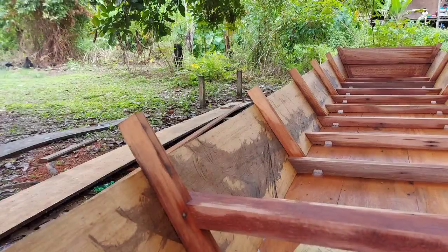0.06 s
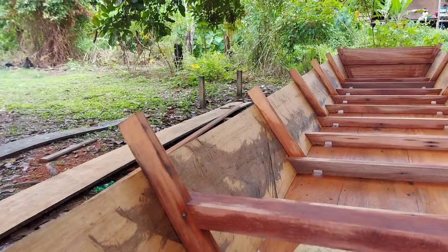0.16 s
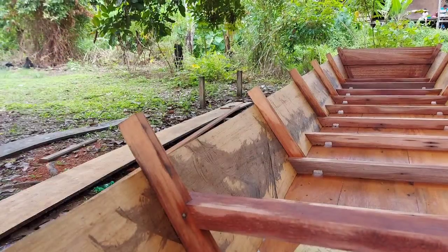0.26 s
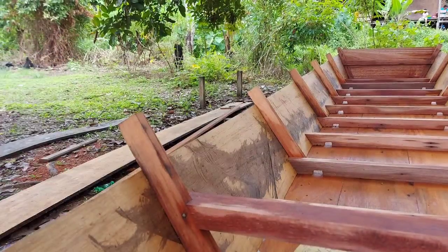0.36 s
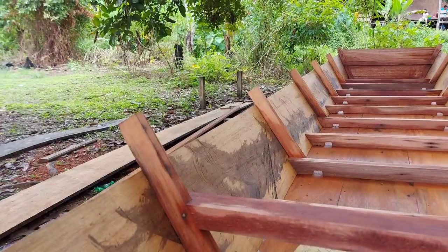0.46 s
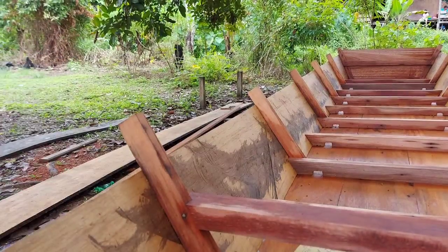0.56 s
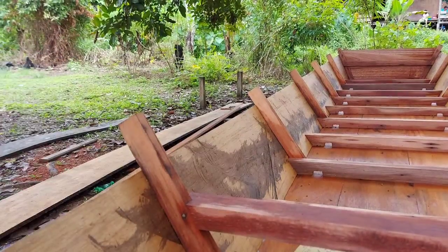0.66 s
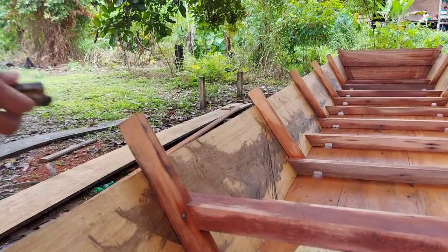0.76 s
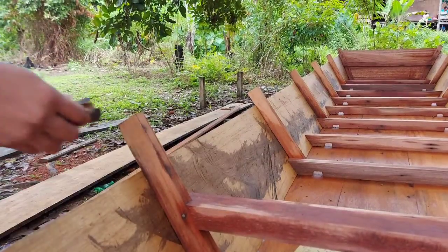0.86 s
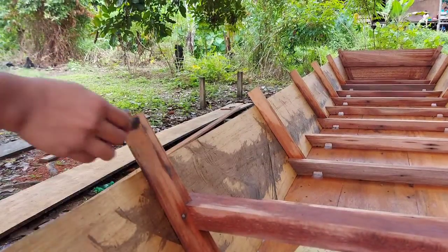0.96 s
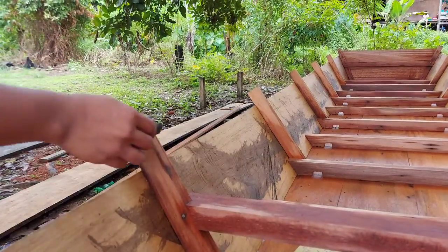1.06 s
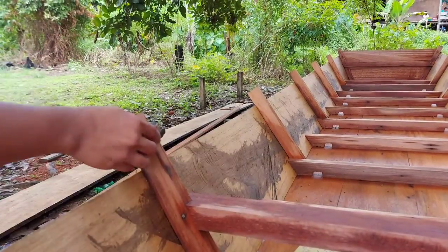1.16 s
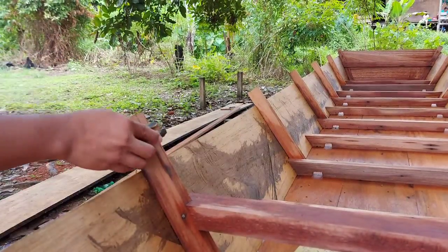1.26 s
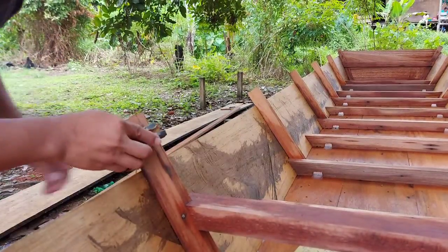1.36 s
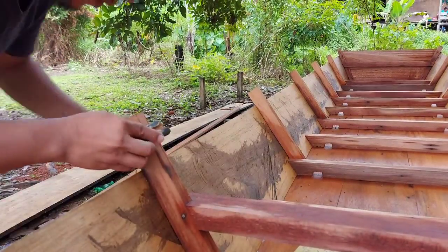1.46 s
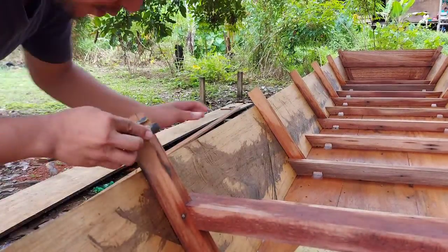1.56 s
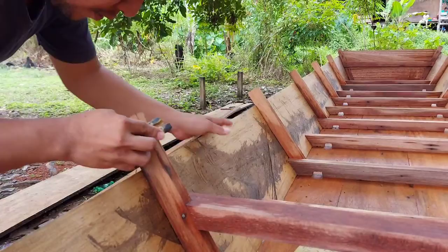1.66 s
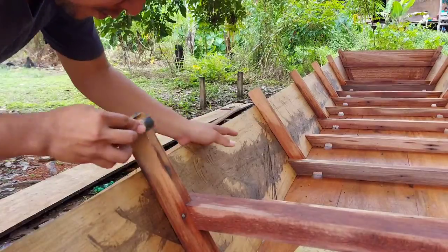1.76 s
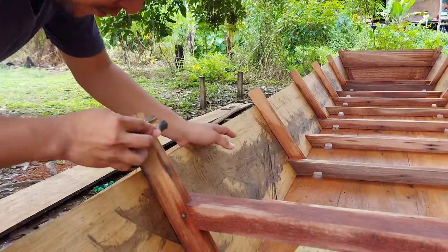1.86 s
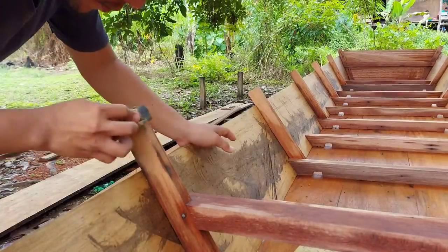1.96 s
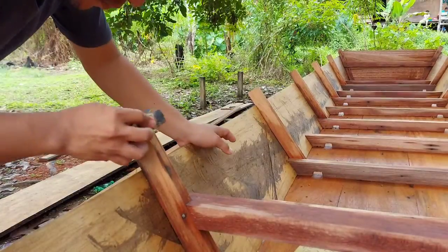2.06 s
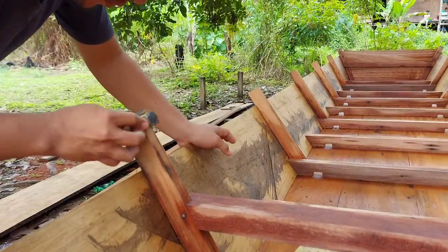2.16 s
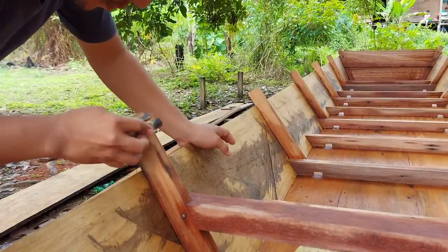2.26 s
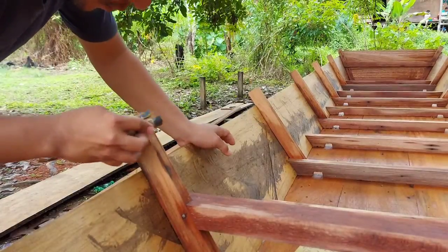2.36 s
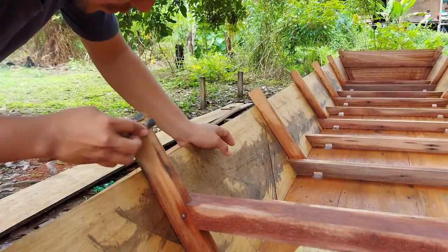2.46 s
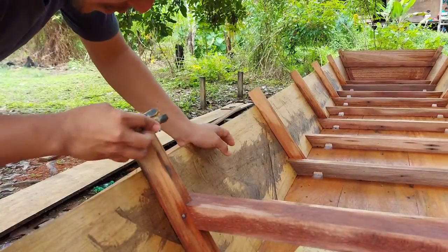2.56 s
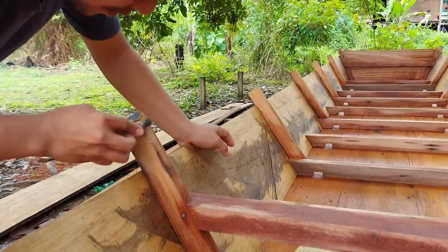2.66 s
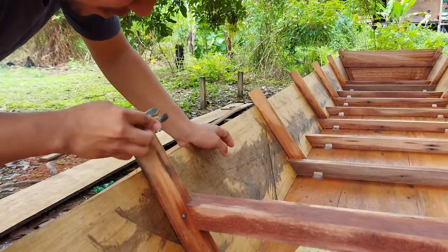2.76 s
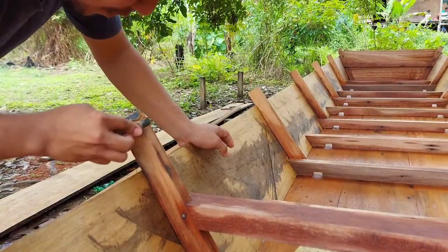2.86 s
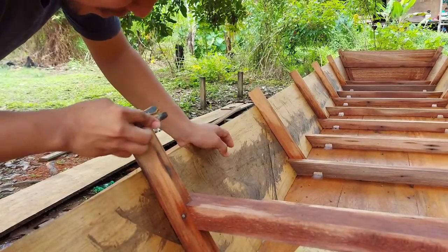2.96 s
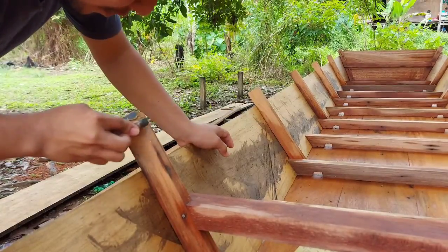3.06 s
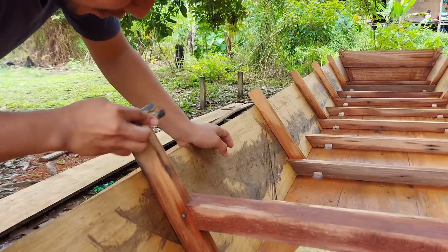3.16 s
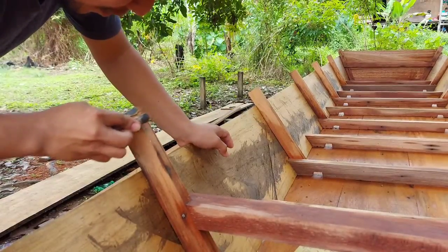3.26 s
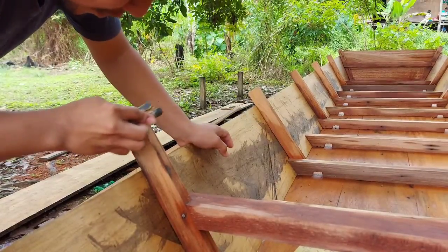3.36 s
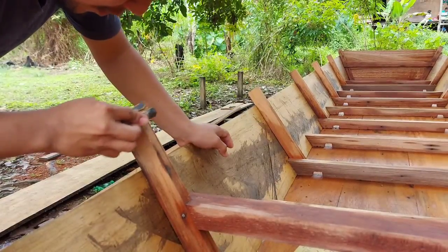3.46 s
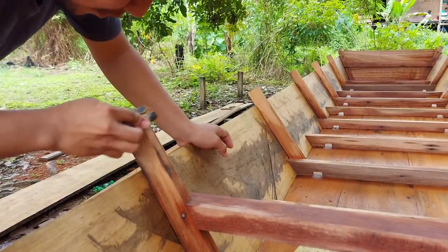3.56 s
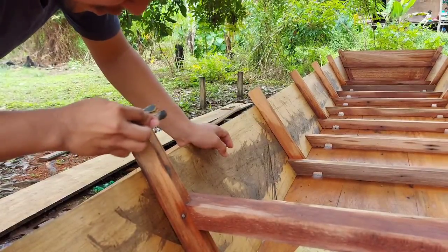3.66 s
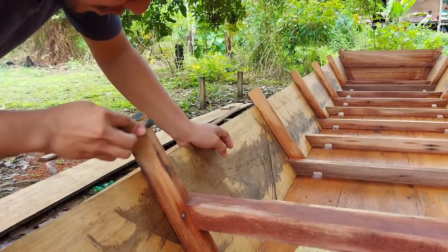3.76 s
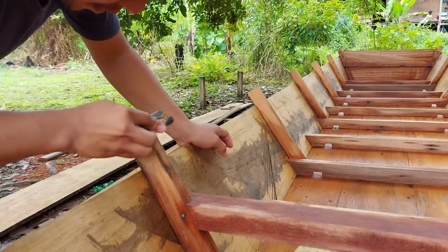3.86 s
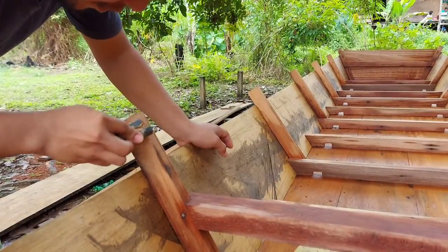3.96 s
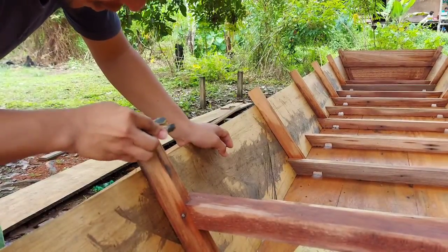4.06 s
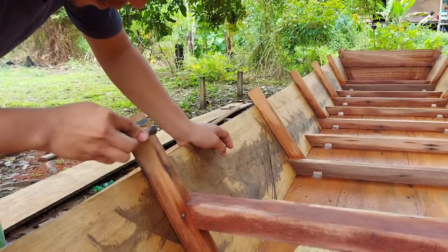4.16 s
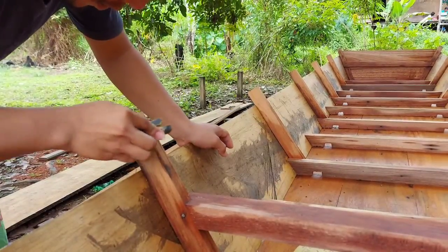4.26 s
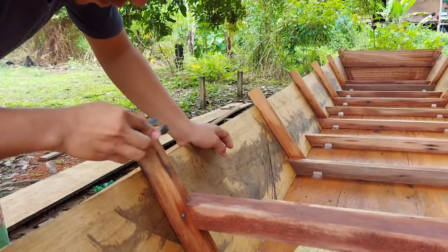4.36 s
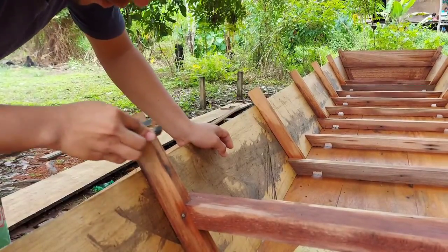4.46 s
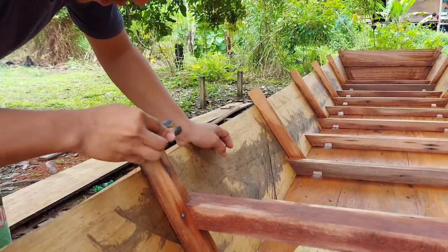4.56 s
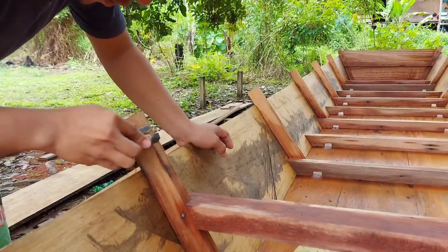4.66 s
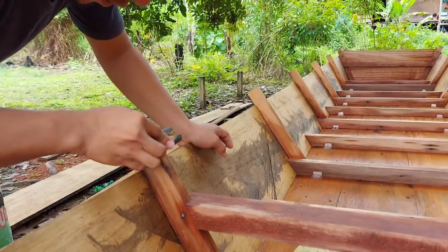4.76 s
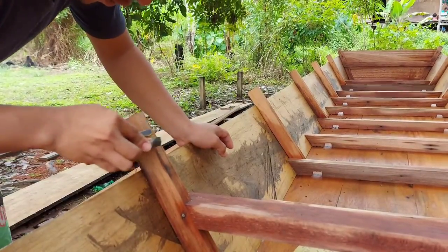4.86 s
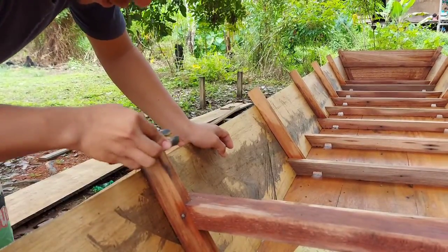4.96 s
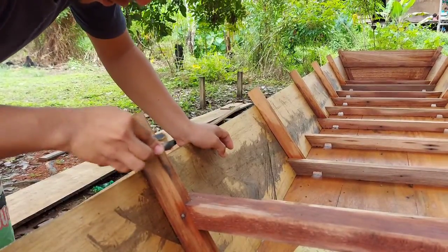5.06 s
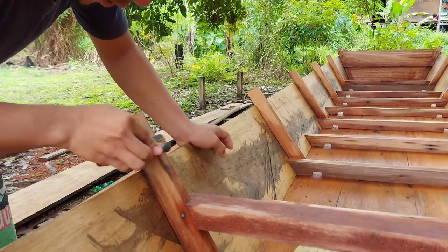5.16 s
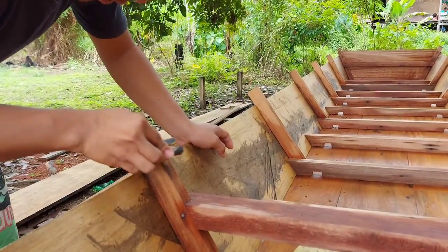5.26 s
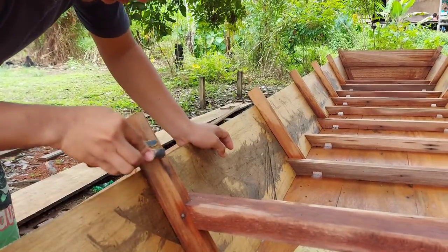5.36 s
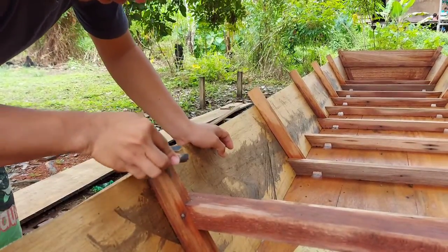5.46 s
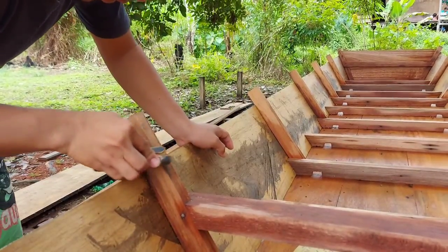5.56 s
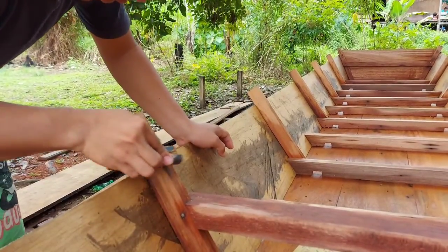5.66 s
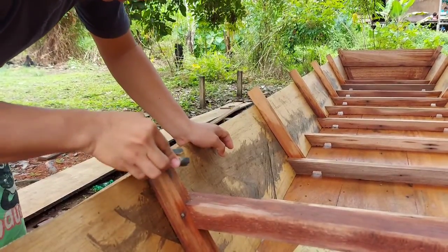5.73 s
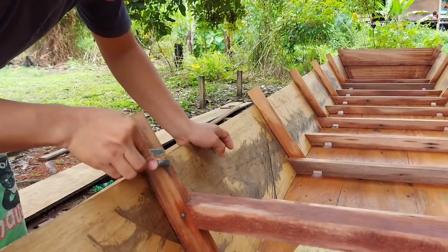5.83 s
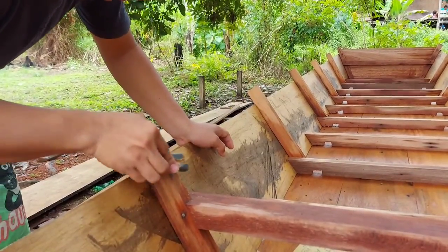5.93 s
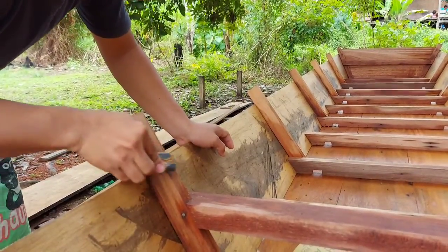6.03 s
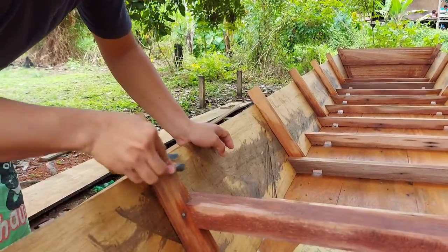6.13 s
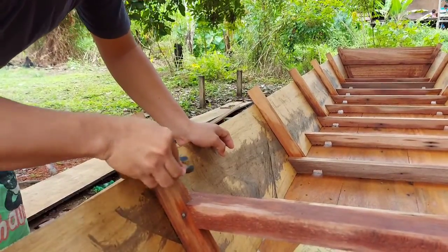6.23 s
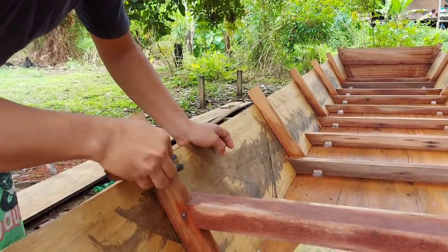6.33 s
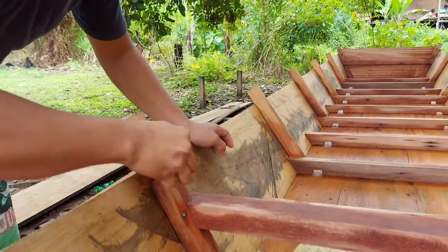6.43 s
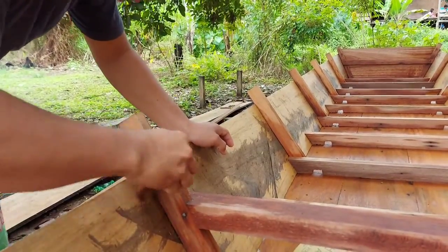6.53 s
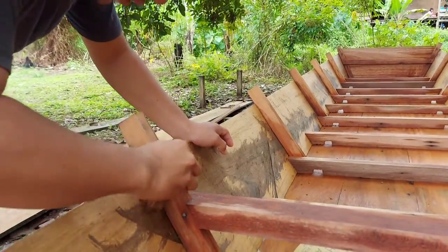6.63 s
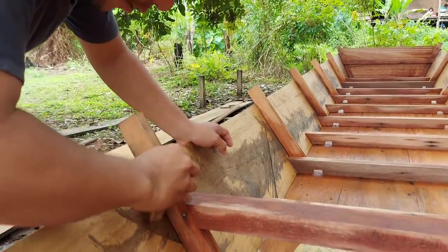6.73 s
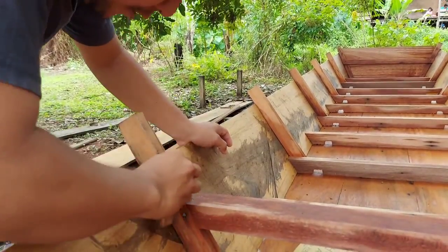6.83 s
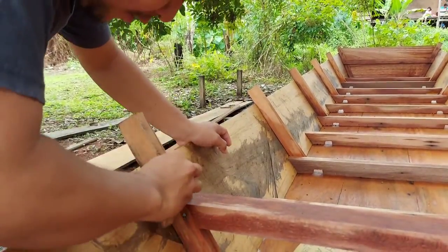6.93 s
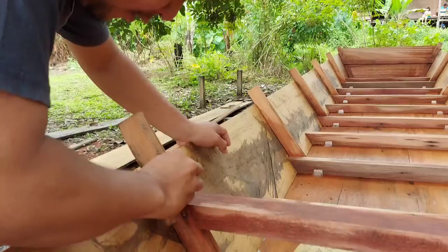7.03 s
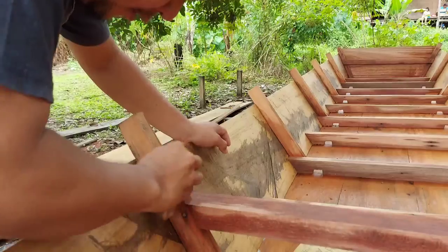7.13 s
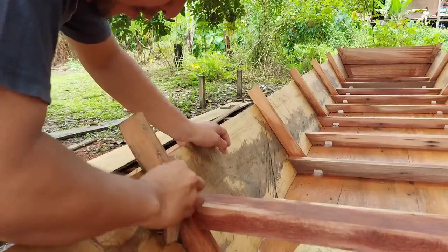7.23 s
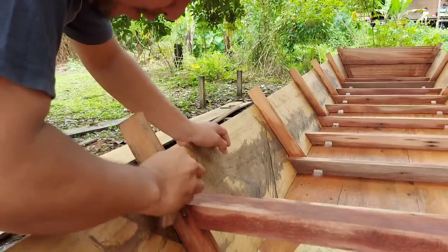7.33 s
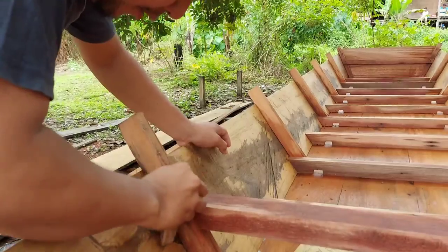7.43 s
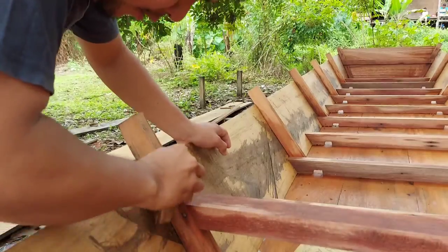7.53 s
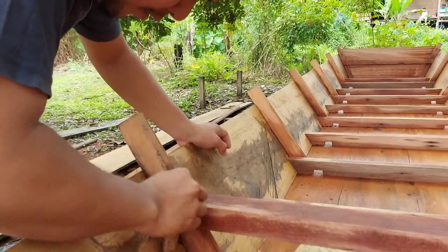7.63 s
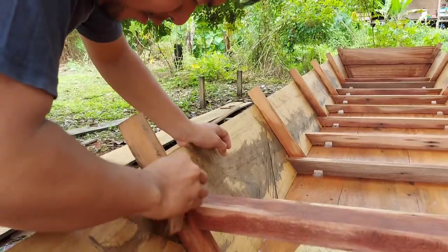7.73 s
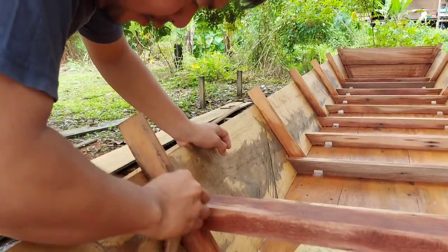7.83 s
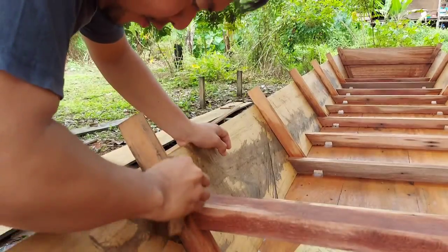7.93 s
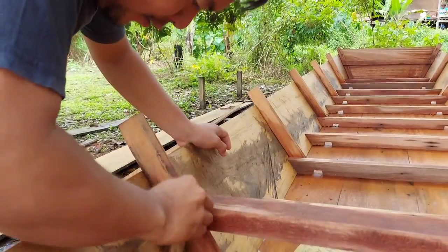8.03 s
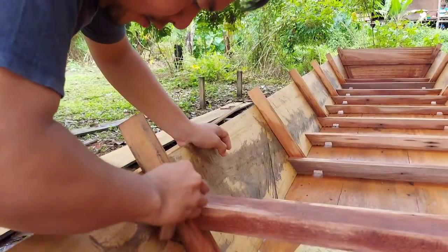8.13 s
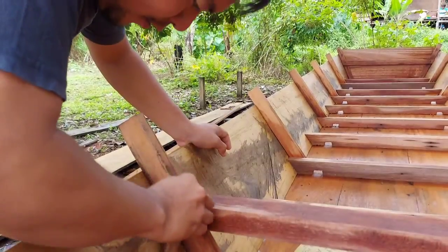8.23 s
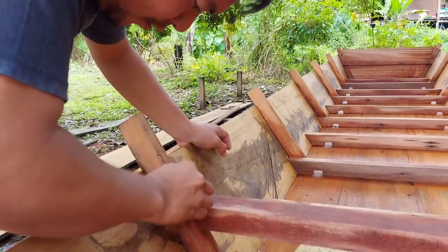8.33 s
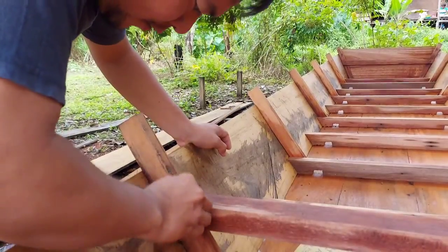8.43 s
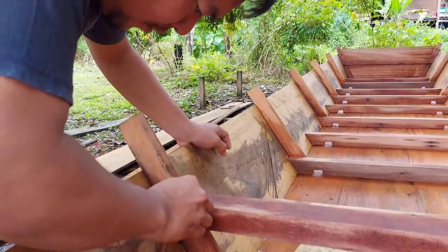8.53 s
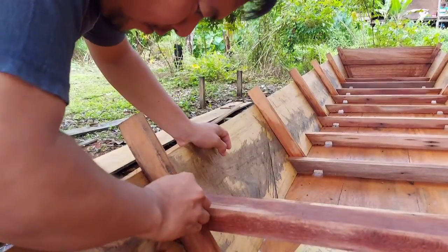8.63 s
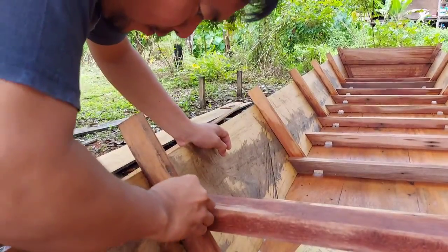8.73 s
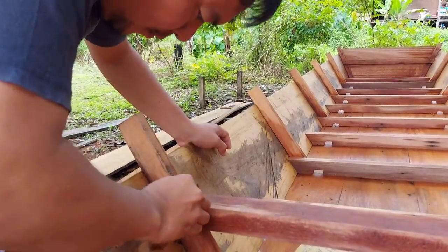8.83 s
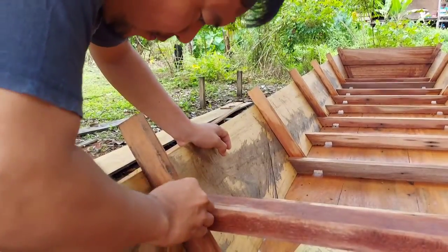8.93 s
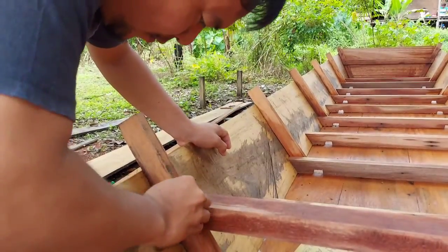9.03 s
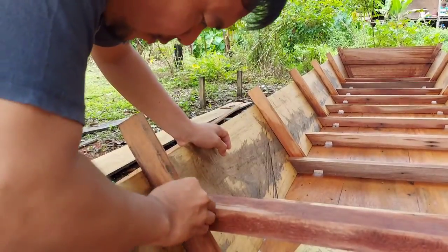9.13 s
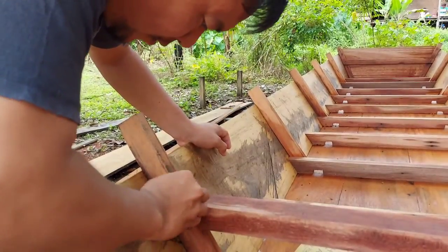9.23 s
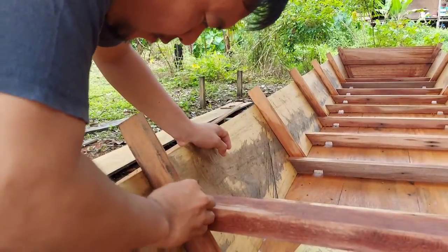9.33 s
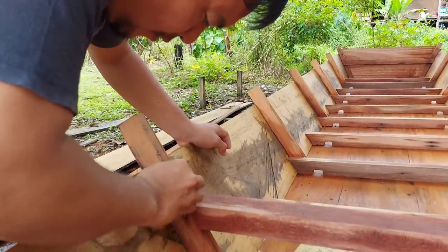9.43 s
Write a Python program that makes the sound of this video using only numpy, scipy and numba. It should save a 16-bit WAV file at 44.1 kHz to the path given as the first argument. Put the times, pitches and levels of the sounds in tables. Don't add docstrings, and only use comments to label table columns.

```python
import sys
import numpy as np
from scipy import signal
from scipy.fft import rfft, irfft, next_fast_len
from scipy.io import wavfile
from scipy.ndimage import uniform_filter1d
from numba import njit

SR = 44100
rng = np.random.default_rng(int(sys.argv[2]) if len(sys.argv) > 2 else 0)


def unload_wav(signal):
    wavfile.write(
        sys.argv[1],
        SR,
        np.round(np.clip(np.atleast_2d(signal).T, -1, 1) * 32767).astype(np.int16),
    )


def invert_db(level):
    return 10 ** (np.asarray(level, dtype=float) / 20)


N = 418509
TIME = np.arange(N) / SR

# start_s, pressure_db, bite_db, hiss_db, break_loose_share
HEAD_STROKES = [(1.477, -18, -9, -1, .3), (1.585, -11.5, -12.5, -3.5, .6), (1.689, -12.5, -9, -2, .3),
                (1.797, -16.5, -11, -2, .3), (1.911, -16, -8, 1.5, .3), (2.016, -15.5, -7, 1.5, .4),
                (2.126, -15.5, -7, 0, .3), (2.237, -15, -8.5, 0.5, .6), (2.352, -14.5, -5, 1, .4),
                (2.46, -14, -5.5, 0, .3), (2.567, -12.5, -6, 0, .3), (2.678, -13.5, -6, 0, .3),
                (2.788, -12, -6, -1.5, .3), (2.888, -13.5, -7.5, 0, .3), (3.001, -11.5, -3, -0.5, .3),
                (3.1, -14, -6, 0.5, .3), (3.213, -11.5, -4, -1, .3), (3.311, -14.5, -6, 1, .3),
                (3.433, -10.5, -3, -0.5, .3), (3.537, -13, -6, 1, .3), (3.654, -13.5, -4, 2, .3),
                (3.762, -12.5, -5.5, -2.5, .3), (3.875, -13.5, -4.5, -0.5, .3), (3.989, -14, -7, 0.5, .4),
                (4.111, -15.5, -5, -0.5, .3), (4.218, -13, -5, -0.5, .3)]
# start_s, pressure_db, bite_db, hiss_db, break_loose_share
EDGE_STROKES = [(4.338, -11, -5, -1, 0.35), (4.45, -12.5, -6.5, 2, 0.48), (4.581, -11.5, -7, 1, .3),
                (4.687, -12.5, -9, 2, .3), (4.8, -15.5, -3.5, -1.5, 0.37), (4.91, -12, -7.5, -0.5, .3),
                (5.032, -15, -3, -1.5, 0.36), (5.145, -12.5, -6, 0.5, .3), (5.261, -20.5, -1.5, 0, 0.28),
                (5.381, -19, -5.5, 0.5, .3), (5.511, -18.5, -5.5, -1, 0.34), (5.621, -20, -8, 0, .3),
                (5.749, -23, -5, -1, .3), (5.867, -22, -3, 0.5, 0.28), (5.993, -21.5, -7.5, 1, 0.39),
                (6.102, -19.5, -5, 0, 0.26), (6.227, -22.5, -6.5, 1, 0.25), (6.339, -20, -8, -0.5, .3)]
# start_s, pressure_db, bite_db, length_s, peak_place_0_1
GROPING = [
    (1.171, -21, -18, 0.067, 0),
    (1.246, -46, 3.5, 0.079, 0),
    (1.384, -17, -10.5, 0.071, 0),
    (6.497, -23, -10, 0.073, 0.47),
    (6.614, -20.5, -12, 0.093, 0),
    (6.721, -22.5, -9.5, 0.094, 0.24),
    (6.832, -19.5, -11, 0.062, 0.2),
]
# start_s, pressure_db, bite_db, length_s, peak_place_0_1
FOOT_JABS = [(7.051, -21.5, -10, 0.08, 0.18), (7.146, -17.5, -4.5, 0.08, 0.5), (7.249, -20, -5, 0.074, 0),
             (7.358, -22, -6.5, 0.079, 0.42), (7.467, -21, -6, 0.087, 0), (7.58, -20, -3.5, 0.076, 0.37),
             (7.681, -23.5, -2, 0.078, 0.02), (7.792, -23.5, -0.5, 0.069, 0.6),
             (7.896, -21.5, -4.5, 0.079, 0), (7.996, -19.5, -4.5, 0.066, 0.4),
             (8.094, -23.5, -6.5, 0.077, 0.37), (8.17, -21, -5, 0.081, 0.71),
             (8.289, -26.5, -7.5, 0.077, 0.56), (8.411, -20, -8, 0.075, 0.46), (8.576, -37, -8, 0.07, 0.24),
             (8.673, -33.5, -5, 0.052, 0.5), (8.762, -29, -14, 0.17, 0.05), (8.868, -28, -9.5, 0.083, 0.2),
             (8.975, -24, -9.5, 0.073, 0.2), (9.071, -26, -7.5, 0.061, 0.56), (9.177, -27, -8, 0.097, 0.05),
             (9.288, -23, -8.5, 0.076, 0.5), (9.385, -28.5, -5, 0.1, 0.71)]
# time_s, rib_sway_re_pressure_db, open_paper_hiss_re_pressure_db
HOLD = [(1.22, 5, -24), (1.3, 20.5, -7), (1.42, 1.5, -19), (1.98, 4, -17.5), (2.3, -0.5, -22),
        (3.35, -3, -18.5), (4.4, -5, -23.5), (5.16, -7, -21.5), (5.55, -2.5, -14.5), (6.64, -7.5, -19.5),
        (6.76, 9, -16), (6.85, 9.5, -17.5), (7.1, -6, -16.5), (7.8, -4, -11.5), (8.66, 3.5, -14),
        (9.4, -1, -11.5)]
# time_s, place_head_0_foot_1, grip_on_top_modes_db
PLACE = [
    (0, 0.13, 4.5),
    (4.7, 0.086, 2.5),
    (5.4, 0.038, -21),
    (6.5, 0.27, -3.5),
    (7.0, 0.5, -5),
]
# mode_hz, width_hz, head_level_db, foot_level_db
HULL = [(179.2, 19.2, 12, -3), (214.8, 19.7, 8.5, 8), (271, 9.1, 1.5, 16), (289.6, 35, 4.5, 17),
        (329.7, 20.8, 1, 15.5), (365.6, 54, 1.5, 11.5), (423.4, 17, 3, 9.5), (510.4, 89, -3.5, -4.5),
        (529, 43.3, 8, 13.5), (551.7, 71, 7, -4), (598, 27.6, 2.5, -23), (644.4, 40, 6.5, -34),
        (699, 37, -6.5, 3), (747.6, 33, 3.5, -28), (789.3, 57, 5.5, -35), (874, 53, -14, -17),
        (877, 75, 0.5, -6), (983, 18, -17, 9.5), (1056, 120, -9.5, -40), (1133, 59, -37, 2),
        (1236, 18, -5, -28), (1363, 110, -15.5, 3), (1442, 88, -14.5, -2.5), (1620, 20, -9, -12),
        (1753, 81, -6, -34), (1980, 9.9, -14, -66), (2146, 69, -12, -40), (2291, 17, -29.5, 0.5),
        (2737, 24, -17, -12), (2920, 186, -39, -3.5)]
# head_left_re_right_db, head_right_lag_rad, foot_left_re_right_db, foot_right_lag_rad
PORTS = [(-1, 0.0, -1, 0.1), (2, 0.1, 1, 0.1), (0, 0.1, 1, 0.2), (1, 0.0, 0, 0.1), (-2, -0.1, -5, -0.1),
         (-5, -0.3, -4, -0.1), (-6, -0.2, -1, 0.3), (10, 1.0, 5, 0.5), (4, 1.5, 6, 1.7), (4, 2.0, 2, 2.8),
         (2, -0.4, 3, 0.0), (-1, -1.6, -1, -1.7), (-12, -0.7, -7, 0.3), (-3, 0.5, -1, -0.2),
         (0, 0.5, 1, -0.0), (-3, -0.9, -4, -0.9), (-5, -1.7, 6, -1.5), (2, 2.6, -1, 2.1),
         (-9, 2.1, 8, -3.0), (3, 1.2, 12, -1.6), (-5, 2.0, 3, -2.3), (5, 1.6, 2, 2.3), (5, 1.8, 3, 2.2),
         (12, 2.2, 5, -2.9), (10, 2.6, 8, 1.7), (-12, -1.7, 0, 1.8), (-1, 1.0, 1, 0.5), (0, 0.9, 10, 1.9),
         (-1, -0.7, 0, -1.2), (-2, 0.1, -3, -0.0)]
# time_s, level_db
PALM = [
    (1.2, -13),
    (1.45, -2),
    (3, 2),
    (5.3, -3.5),
    (6.0, -5),
    (6.9, -10),
    (7.2, -3),
    (8.5, -0.5),
    (8.7, -5),
    (9.4, -0.5),
]
# time_s, level_db
ARM = [
    (1.4, -2),
    (2, 1.5),
    (3.4, -0.5),
    (5.2, -2.5),
    (6, -1),
    (6.7, -4.5),
    (7.1, -5.5),
    (7.6, 0.5),
    (8.6, 2),
    (9.4, 0),
]
# band_hz, left_db, right_db
GRIT = [(835, 6, 5), (1390, -9, -17), (2840, -9.5, -7), (3200, -7.5, -10.5), (4440, -18, -8),
        (5000, -15.5, -12), (6500, -16, -14.5), (7700, -25, -11), (8200, -35, -13), (8750, -15, -10),
        (9900, -18, -18.5), (11470, -19.5, -9.5), (11600, -15.5, -14.5), (15700, -28, -21)]
# time_s, level_db
SHADE = [
    (1.4, 0),
    (3, 0.5),
    (5.1, 0.5),
    (5.6, -8),
    (7, -2.5),
    (7.8, -8),
    (8.5, -1),
    (8.9, -4),
    (9.4, -3),
]
# time_s, wood_jolt_db, paper_crackle_db
SNAGS = [(1.208, -21, -50), (1.715, -7.5, -46), (1.812, -12, -32), (1.969, -4, -28), (2.028, -16, -29),
         (2.185, -8, -49), (2.253, -22, -46), (2.363, -20, -46), (2.411, -2.5, -28), (2.472, -4, -24),
         (2.602, -30, -43), (2.617, -14, -28), (2.689, -25, -34), (2.714, -13, -41), (2.833, -12, -47),
         (2.953, -28, -39), (3.007, -12, -40), (3.035, -6, -33), (3.064, -21, -43), (3.121, -30, -49),
         (3.23, -7, -43), (3.262, -19, -22), (3.442, -22, -42), (3.548, -15, -43), (3.566, -34, -24),
         (3.671, -2.5, -39), (3.725, -12, -19.5), (3.907, -2, -40), (4.001, -18, -48), (4.047, -8, -44),
         (4.233, -32, -46), (4.353, -7, -51), (4.488, -31, -46), (4.586, -3.5, -31), (4.737, -4, -41),
         (4.844, -35, -44), (4.949, -23, -36), (4.989, -11, -48), (5.057, -4, -44), (5.165, -20, -46),
         (5.186, -15, -29), (5.303, -7, -48), (5.399, -17, -49), (5.654, -13.5, -55), (5.771, -12, -54),
         (6.004, -17, -46), (7.484, -14, -32), (7.622, -8, -41), (7.699, -18.5, -28), (7.83, -17, -40),
         (7.908, -20, -43), (8.187, -10.5, -47), (8.455, -39, -28), (8.6, -24, -55), (8.71, -33, -44),
         (8.775, -27, -47), (8.879, -33, -37), (8.993, -18, -57), (9.188, -21, -38), (9.398, -50, -34)]
# time_s, click_db, thud_re_click_db, click_hz, left_re_right_db
KNOCKS = [(0.7178, -45, -3, 8660, -2), (0.758, -32, -10, 1980, 23), (1.0994, -33, -16, 2470, -5),
          (1.4386, -19, -16, 1620, -0.5), (6.85, -28.5, 18.5, 990, 24), (7.3997, -20.5, 4.5, 1133, 6),
          (7.619, -28, 11, 1140, 10), (8.3447, -33, -21, 1010, -29), (8.455, -27.5, 15.5, 1000, 10),
          (8.8778, -23, 0, 1180, -1), (8.047, -29.5, 16.5, 980, 3), (9.4, -25, -12, 4480, -3),
          (9.4005, -27, -27, 8060, -3), (9.401, -27, -30, 3020, -3), (4.988, -26, 12, 900, 2),
          (5.185, -34, -4, 1000, 2)]
# time_s, pitch_hz, level_db
PLANK = [
    [(0, 337, -52), (.14, 308, -54)],
]
# time_s, level_db
SHUFFLE = [
    (.3, -84),
    (.5, -62),
    (.65, -54.5),
    (.8, -59),
    (1.0, -80),
]
# time_s, level_db
RUSTLE = [
    [(0, -62), (.05, -83), (.5, -83), (.6, -62), (.77, -54.5), (.88, -64), (1.15, -69)],
]
# time_s, pitch_hz, level_db
HIGH_BIRD = [
    [(.3, 5620, -74), (.37, 5640, -63), (.46, 5690, -66), (.53, 5850, -65), (.63, 5860, -63),
     (.85, 5890, -72)],
    [(.95, 5420, -72), (1.03, 5550, -60), (1.15, 5630, -58), (1.32, 5735, -61.5), (1.9, 5850, -59)],
]
LOW_BIRD = [
    [(0.34, 3170, -72), (0.374, 3175, -62), (0.57, 3150, -69)],
    [(.53, 3770, -68), (.61, 3848, -62), (.75, 3900, -70)],
]
FAR_BIRD = [
    [(.74, 2600, -61), (.97, 2550, -64)],
    [(1.0, 2420, -55), (1.08, 2360, -61), (1.15, 2455, -59), (1.33, 2400, -71)],
    [(1.3, 1992, -60), (1.37, 1998, -59)],
]
# time_s, pitch_hz, level_db
HUM = [
    [(.6, 1670, -72), (.67, 1690, -60), (.71, 1675, -68)],
    [(.67, 1380, -70), (.73, 1361, -58), (.76, 1350, -69)],
    [(.63, 2020, -72), (.72, 2060, -67)],
]
# centre_hz, width_hz, level_db, left_re_right_db
INSECTS = [
    (6960, 610, -59, -9.5),
    (8750, 630, -59, -14.5),
    (10300, 1700, -60, 2),
]
# time_s, level_db
RUMBLE = [
    (0.0, -50.5),
    (.95, -51),
    (1.58, -45),
    (9.49, -46),
]
# time_s, swell_over_rumble_db
LURCHES = [
    (.8, 2),
    (4.76, 5.5),
    (6.79, 3),
    (7.4, 8.5),
    (7.82, 5),
]
# band_hz, left_db, right_db
GARDEN = [(25, -22, -23), (45, 1, 1), (63, 12, 11.5), (115, 15, 19), (308, -0.5, -3.5), (600, -15.5, -15),
          (1110, -30, -30), (2000, -19.5, -20), (2780, -17.5, -16.5), (3530, -11, -10), (5270, -14, -14),
          (5980, -11.5, -4), (7600, -14.5, -38), (10700, -18, -13.5), (12300, -21, -21), (15500, -26, -26)]

TURN_HEAD_S, TURN_EDGE_S, LONGEST_S = 0.018, 0.024, 0.106
PEAK_PUSH, PEAK_PULL = 0.55, 0.5
HISS_DB_PER_BITE_DB, SWAY_DB_PER_BITE_DB = 0.67, 0.31
STICK_S, GRAB_SHARE, GRAB_FADE_S = 0.0065, 0.25, 0.007
JOLT_FADE_S, CRACKLE_FADE_S = 0.0093, 0.0019
MODE_DRIFT_SHARE, FELT_HZ = 0.018, 29.2
TRAIL_HZ, TRAIL_SHARE = 26.3, 0.21
DUST_HZ, DUST_SHARE = 21.2, 0.29
WOBBLE_HZ, LURCH_S = 20.5, 0.12
ENGINE_HZ, ENGINE_RE_RUMBLE_DB = 66.2, -3.5


def stroke_rows():
    rows = [(*row, 0, GRAB_SHARE) for row in GROPING + FOOT_JABS]
    starts = np.sort([row[0] for row in rows + HEAD_STROKES + EDGE_STROKES])
    for table, turn_s in ((HEAD_STROKES, TURN_HEAD_S), (EDGE_STROKES, TURN_EDGE_S)):
        for k, row in enumerate(table):
            gap_s = starts[starts > row[0]][0] - row[0]
            length_s = min(gap_s - turn_s, LONGEST_S)
            peak = PEAK_PULL if k % 2 else PEAK_PUSH
            rows.append((*row[:3], length_s, peak, *row[3:]))
    return sorted(rows)


def strokes():
    out = np.zeros((4, N))
    sway_db, open_db = curve(HOLD)
    bite_shares = np.array([[0], [1], [HISS_DB_PER_BITE_DB], [SWAY_DB_PER_BITE_DB]])
    speed_powers = np.array([[.6], [.8], [.9], [.6]])
    for start_s, press_db, bite_db, length_s, peak, hiss_db, grab in stroke_rows():
        i = slice(int(start_s * SR), min(int((start_s + length_s) * SR), N))
        u = np.clip((TIME[i] - start_s) / length_s, 0, 1)
        skew = np.log(.5) / np.log(np.clip(peak, .13, .8))
        swing = np.abs(np.sin(np.pi * u ** skew))
        free_s = np.maximum(u * length_s - STICK_S, 0)
        speed = np.clip(free_s / 0.0034, 0, 1) * (swing + abs(grab) * np.exp(-free_s / GRAB_FADE_S))
        shares_db = bite_db * bite_shares + np.array([[0], [0], [hiss_db], [0]])
        out[:, i] += invert_db(press_db + shares_db) * speed ** speed_powers
    press, rasp, hiss, sway = out
    return press, rasp, hiss * invert_db(open_db), sway * invert_db(sway_db)


def catches(per_s, spread_db, smooth):
    x, when = np.zeros(N), np.sort(rng.integers(0, N, 60000))
    happens, height, sign = rng.random((3, len(when)))
    size = invert_db(spread_db * np.minimum(-np.log(height + 1e-9), 3)) * (2 * sign - 1)
    x[when] = size * (happens < per_s * N / SR / len(when))
    x = x / x.std() + smooth * rng.standard_normal(N)
    return x / x.std()


def hull(press, rasp, sway, push):
    place, grip_db = curve(PLACE)
    boom = sway * invert_db(7.5)
    spots = [catches(1500, 2.66, 0.74) * invert_db(2.72 * walk(20) + 2.15 * walk(70)) for _ in range(7)]
    coarse = 0.51 * catches(220, 3.9, 0.045)
    drifts = [MODE_DRIFT_SHARE * walk(8) for _ in range(3)]
    palm, arm = invert_db(curve(PALM)[0]), invert_db(curve(ARM)[0])
    out, half = np.zeros((2, N)), np.array([.5, -.5])
    for k, ((hz, width_hz, head_db, foot_db), ports) in enumerate(zip(HULL, PORTS)):
        if hz < 250:
            drive = boom
        elif hz < 960:
            drive = press
        else:
            drive = rasp * invert_db(5.0 + (hz > 1900) * grip_db)
        if 660 < hz < 1300:
            drive = drive * palm
        elif 250 < hz < 400:
            drive = drive * arm
        head = invert_db(5.0 + head_db + half * ports[0]) * np.exp(1j * half * ports[1])
        foot = invert_db(2.0 + foot_db + half * ports[2]) * np.exp(1j * half * ports[3])
        moving_hz = hz * (1 + min(0.45 + hz / 1800, 1) * drifts[k % 3])
        damped_hz = 1.18 * width_hz + FELT_HZ if hz > 960 else width_hz
        poles = np.exp((2j * moving_hz - damped_hz) * np.pi / SR)
        add_mode(out, drive * (spots[k % 7] + coarse) + push, poles, head, foot, place)
    return out


@njit
def add_mode(out, x, poles, head, foot, place):
    a, b, g = 0j, 0j, 1 - abs(poles[0])
    for i in range(len(x)):
        a = a * poles[i] + g * x[i]
        b = b * poles[i] + 2 * g * a
        for c in range(2):
            out[c, i] += (b * (head[c] + (foot[c] - head[c]) * place[i])).real


def grit(hiss):
    both, left, right = (catches(3000, 3.9, 0.4) for _ in range(3))
    patchy = invert_db(np.array([2.3 * walk(50), 2.4 * walk(50)]))
    shared = np.array([both, np.roll(both, 6)])
    x = invert_db(17.0) * hiss * patchy * (0.41 * shared + 0.46 * np.array([left, right]))
    out = np.zeros((2, N + 400))
    edges = [int(row[0] * SR) for row in stroke_rows()] + [N]
    fade = np.exp(-np.arange(400) / SR / 0.0068)
    for a, b in zip(edges, edges[1:]):
        echoes = 0.38 * rng.standard_normal((2, 400)) * (rng.random((2, 400)) < .04) * fade
        echoes[:, 0] = 1
        echoes /= np.sqrt(np.sum(echoes ** 2, axis=1, keepdims=True))
        out[:, a:b + 399] += signal.fftconvolve(x[:, a:b], echoes, axes=1)
    out = out[:, :N]
    finest = signal.sosfiltfilt(signal.butter(2, 11000, "high", fs=SR, output="sos"), out)
    out = out + (invert_db(curve(SHADE)[0] + 3.1 * walk(25)) - 1) * finest
    return colour(signal.sosfilt(signal.butter(2, 750, "high", fs=SR, output="sos"), out), GRIT)


def snags():
    jolt, crackle, blows = np.zeros((3, N))
    t, blow = np.arange(2048) / SR, np.hanning(12)
    for s, jolt_db, crackle_db in SNAGS:
        i = int(s * SR)
        jolt[i:i + 2048] += invert_db(jolt_db - 8.5) * np.exp(-t / JOLT_FADE_S)
        crackle[i:i + 2048] += invert_db(crackle_db + 0.5) * np.exp(-t / CRACKLE_FADE_S)
        blows[i:i + len(blow)] += invert_db(jolt_db + 3.0) * blow
    return jolt, crackle, blows


def knocks():
    clicks, push = np.zeros((2, N)), np.zeros(N)
    fade = np.exp(-np.arange(1024) / SR / 0.0072)
    blow = np.pad(np.hanning(30), (0, 994))
    thud = 0.5 * ring(blow, 410, 57).imag + 1.2 * ring(blow, 590, 60).imag + 1.3 * ring(blow, 235, 50).imag
    for s, db, thud_db, hz, pan_db in KNOCKS:
        i = int(s * SR)
        noise = rng.standard_normal(1024)
        click = 0.31 * uniform_filter1d(noise, size=4) * fade + 1.1 * ring(noise * fade, hz, 0.098 * hz).real
        clicks[:, i:i + 1024] += invert_db(db - 3.5) * sides(pan_db) * click + invert_db(db + thud_db - 5.0) * thud
        push[i:i + 30] += invert_db(db + thud_db + 1.5) * blow[:30]
    return clicks, push


def whistle(tables, pan_db):
    out = np.zeros(N)
    for rows in tables:
        start_s, end_s = rows[0][0], rows[-1][0]
        i = slice(int(start_s * SR), int(end_s * SR))
        hz, db = (c[i] for c in curve(rows))
        gate = np.clip(np.minimum(TIME[i] - start_s, end_s - TIME[i]) / 0.022, 0, 1)
        phase = 2 * np.pi * np.cumsum(hz + WOBBLE_HZ * walk(59.6)[i]) / SR
        flutter_db = 3 * walk(60)[i]
        out[i] += gate * invert_db(db + 1.5 + flutter_db) * np.sin(phase)
    return out * sides(pan_db)


def insects():
    out = np.zeros((2, N))
    for hz, width_hz, db, pan_db in INSECTS:
        shimmer_db = .9 * walk(6) + .6 * walk(40)
        out += invert_db(db + shimmer_db) * sides(pan_db) * band(hz, width_hz)
    return out


def rumble_db():
    return curve(RUMBLE)[0] + sum(db * np.exp(-((TIME - s) / LURCH_S) ** 2) for s, db in LURCHES)


def garden():
    noise = rng.standard_normal((3, N))
    breeze = invert_db(.7 * walk(3) + 1.7 * walk(14))
    low = signal.butter(2, 260, fs=SR, output="sos")
    wide = signal.butter(2, [260, 14000], "band", fs=SR, output="sos")
    bass = signal.sosfilt(low, noise[2] + 0.3 * noise[:2]) * invert_db(rumble_db() + 48.5)
    rest = signal.sosfilt(wide, noise[:2]) * breeze
    out = invert_db(-37.0) * colour(bass + rest, GARDEN)
    out += invert_db(curve(RUSTLE[0])[0]) * band(2150, 2000)
    out += invert_db(curve(SHUFFLE)[0] + 2.7 * walk(18)) * band(390, 280)
    out += invert_db(rumble_db() + ENGINE_RE_RUMBLE_DB + 2 * walk(3.9)) * band(ENGINE_HZ, 10.7)[0]
    birds = whistle(HIGH_BIRD, -4) + whistle(LOW_BIRD, -2) + whistle(FAR_BIRD, -1.5)
    return out + insects() + birds + whistle(PLANK, -2) + whistle(HUM, -.6)


def curve(rows):
    s, *columns = np.transpose(rows)
    return [np.interp(TIME, s, c) for c in columns]


def colour(x, table):
    hz, *dbs = np.transpose(table)
    size = next_fast_len(N)
    log_hz = np.log(np.fft.rfftfreq(size, 1 / SR) + 1)
    gains = invert_db(np.array([np.interp(log_hz, np.log(hz), db) for db in dbs]))
    return irfft(rfft(x, size) * gains, size)[:, :N]


def ring(x, hz, width_hz):
    pole = np.exp((2j * hz - width_hz) * np.pi / SR)
    return signal.lfilter([2 * (1 - abs(pole))], [1, -pole], x)


def band(hz, width_hz):
    sos = signal.butter(2, [hz - width_hz / 2, hz + width_hz / 2], "band", fs=SR, output="sos")
    x = signal.sosfilt(sos, rng.standard_normal((2, N)))
    return x / x.std()


def walk(rate_hz):
    held = np.repeat(rng.standard_normal(int(N / SR * rate_hz) + 2), 8)
    soft = 0.88 * uniform_filter1d(uniform_filter1d(held, size=8), size=8)
    return np.interp(TIME * rate_hz * 8, np.arange(len(soft)), soft)


def sides(pan_db):
    return invert_db(np.array([[pan_db], [-pan_db]]) / 2)


def scene():
    judder = invert_db(1.7 * walk(40) + 1.5 * walk(120))
    press, rasp, hiss, sway = strokes() * judder
    press = press + 0.081 * ring(press, 0, 2.1).real
    rasp = rasp + TRAIL_SHARE * ring(rasp, 0, TRAIL_HZ).real
    hiss = hiss + DUST_SHARE * ring(hiss, 0, DUST_HZ).real
    jolt, crackle, blows = snags()
    clicks, push = knocks()
    wood = hull(press + jolt, rasp + invert_db(-7.5) * jolt, sway, push + blows)
    return wood + grit(hiss + crackle) + clicks + garden()


def top_cut(x):
    return signal.sosfilt(signal.butter(12, 16650, fs=SR, output="sos"), x)


def record(dry):
    top = signal.ellip(14, .3, 80, 15820, fs=SR, output="sos")
    rounded = np.tanh(1.214 * dry) / 1.456
    mix = signal.sosfilt(top, rounded)
    return top_cut(mix)


dry = scene()
out = record(dry)
unload_wav(out)
```